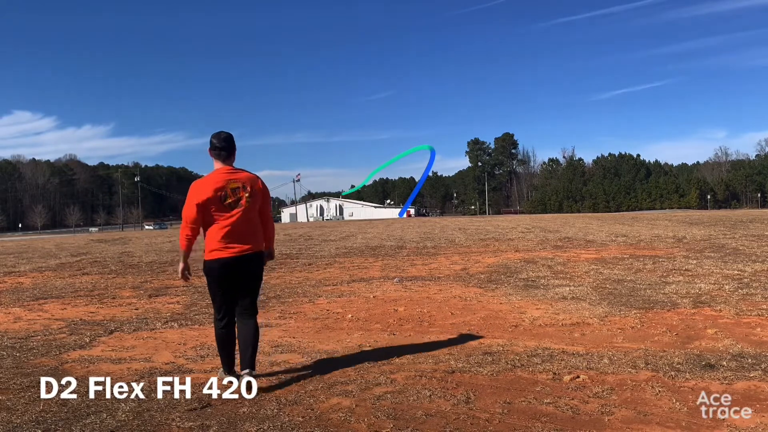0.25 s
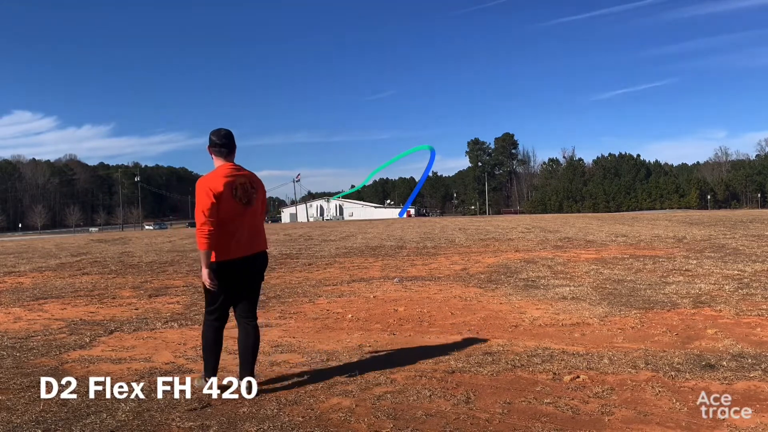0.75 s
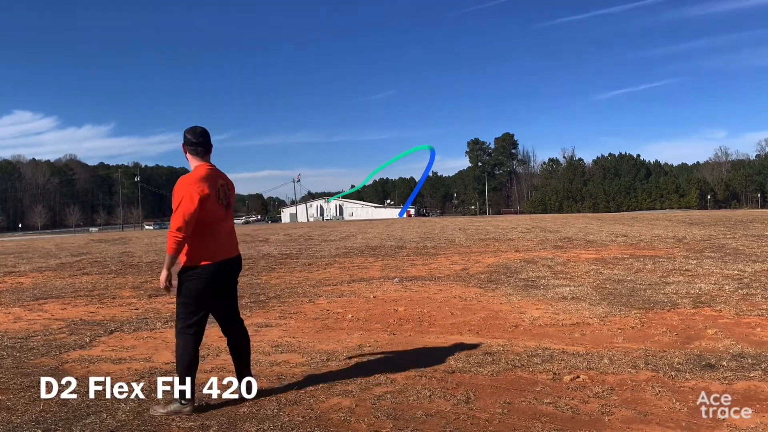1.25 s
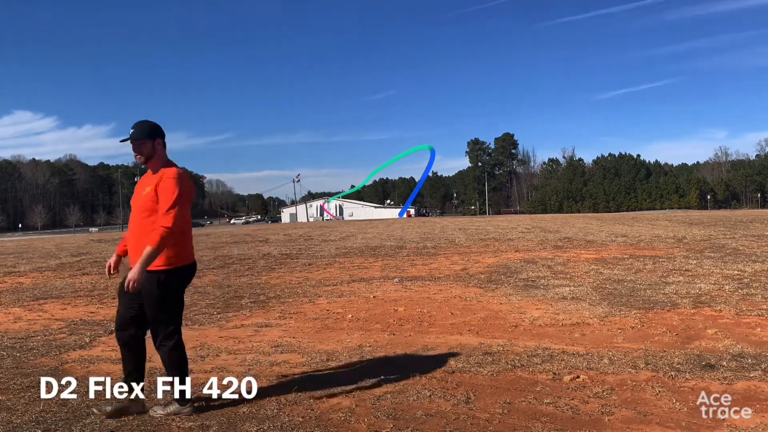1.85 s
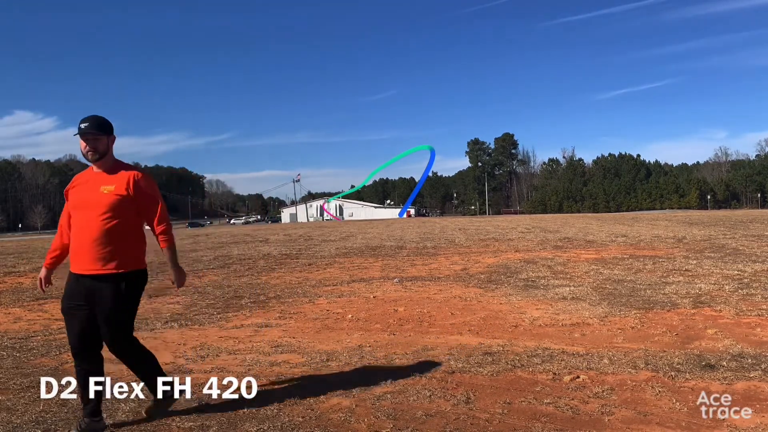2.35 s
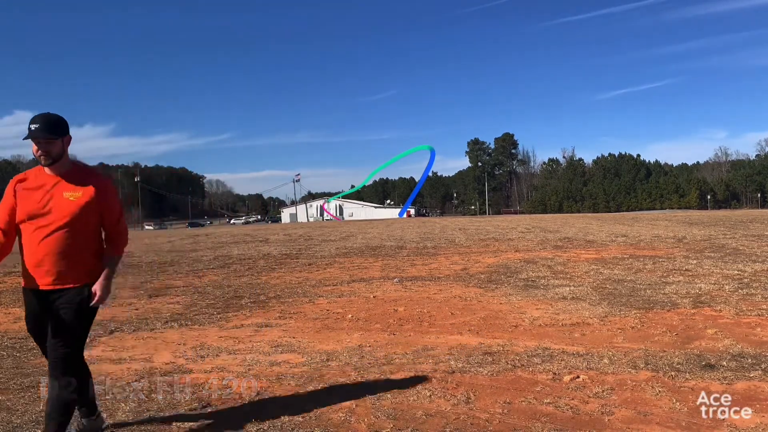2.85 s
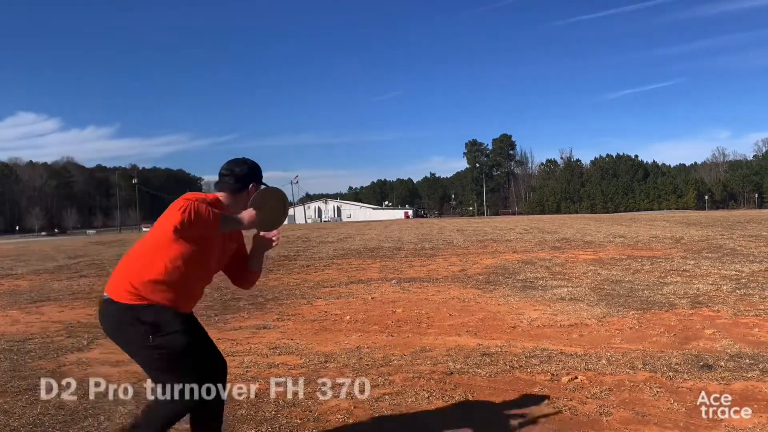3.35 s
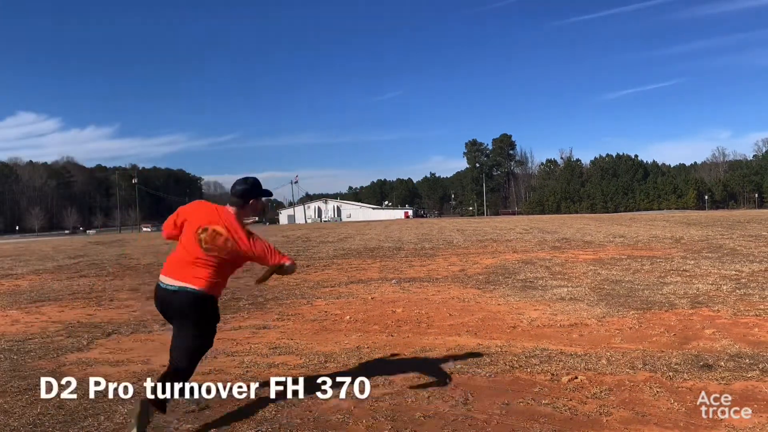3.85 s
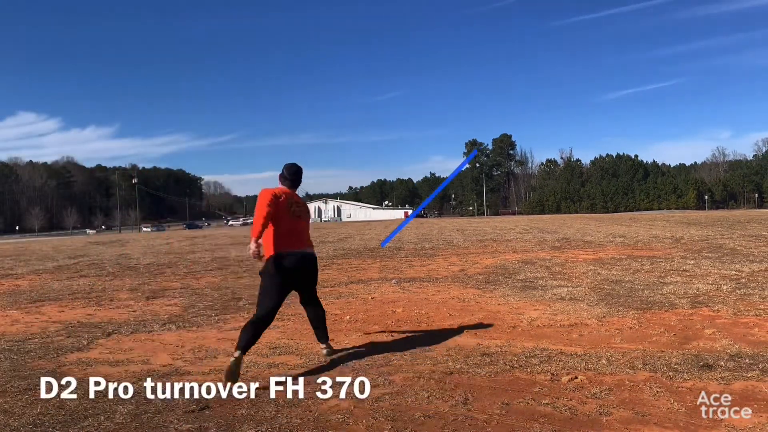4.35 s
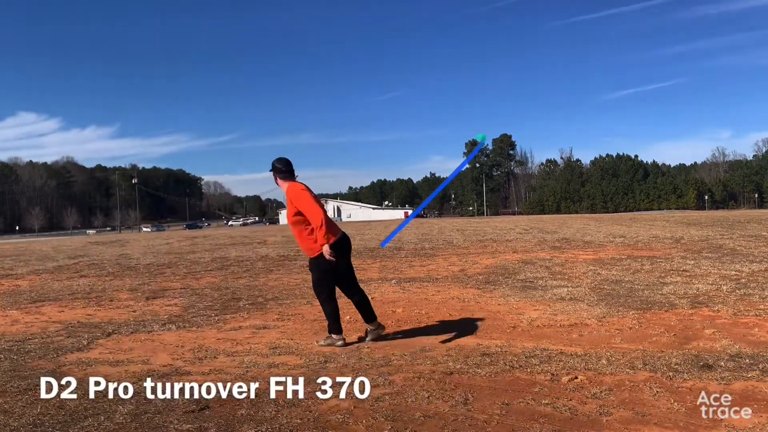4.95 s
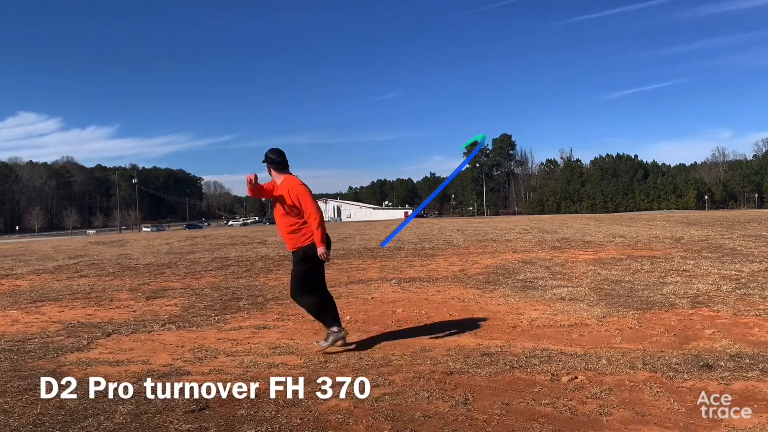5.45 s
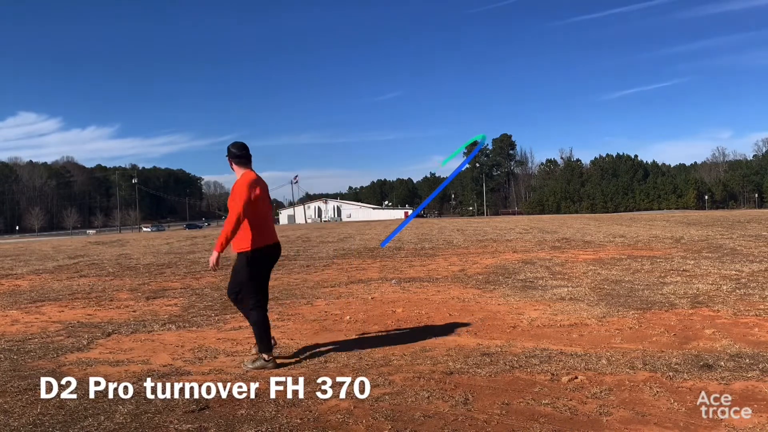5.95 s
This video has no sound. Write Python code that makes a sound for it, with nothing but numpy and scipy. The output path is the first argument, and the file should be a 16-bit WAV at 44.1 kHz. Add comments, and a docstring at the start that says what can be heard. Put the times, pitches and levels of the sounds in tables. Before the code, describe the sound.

In an open field near a road, traffic rumbles and soft wind buffets the microphone. A vehicle with a low, throbbing engine passes from left to right, its tyres hissing and grit ticking. After a quick dip, a far engine drones while nearby shoes rustle dry grass, scuff clay and snap stalks. A plastic disc is flung with a sharp, briefly ringing pop, and a few lighter steps follow.

```python
"""An open field near a road, in two moments joined by a short fade. In the first, a vehicle with a
loping engine passes from left to right, its tyres hissing and grit ticking; in the second, a far engine
drones. A walker's shoes rustle dry grass, scuff clay and knock clods, stalks snap, and a flung plastic
disc rings briefly. Traffic rumbles and soft wind buffets the microphone, whose two ports hear each
source with their own phase and level."""
import sys
import numpy as np
from scipy import signal
from scipy.fft import rfft, irfft, next_fast_len
from scipy.io import wavfile
from scipy.ndimage import uniform_filter1d, map_coordinates

SR = 44100
rng = np.random.default_rng(int(sys.argv[2]) if len(sys.argv) > 2 else 0)


def waveform_to_disk(signal):
    """Save audio, clipped to [-1, 1], as 16-bit WAV at the path in sys.argv[1]."""
    frames = np.transpose(np.atleast_2d(signal))
    scaled = np.clip(frames, -1, 1) * 32767
    samples = np.round(scaled).astype(np.int16)
    wavfile.write(sys.argv[1], SR, samples)


N = 273488
JOIN_S = 2.938  # the second moment begins

# Spectra of dry grass and of clay grit: (frequency [Hz], level [dB])
GRASS_SPECTRUM = [(3000, -20.5), (5000, -10), (7000, -2.5), (9000, 4.5), (10500, 5.5), (12500, 4.5),
                  (14000, 2.5), (15500, -4)]
GRIT_SPECTRUM = [(1800, -11.5), (2600, 0), (4000, 5.5), (6000, -2.5), (8500, -8)]
# Phase between the ports for far sounds and wind: (frequency [Hz], left lead [rad])
FAR_PHASE = [(60, -.1), (200, -.4), (350, .6), (750, 2.2), (1500, 2.7), (5000, 2.8), (8700, 3.14),
             (11200, 0), (13500, -3.14), (15800, -6.28)]
# Their balance: (frequency [Hz], left minus right [dB])
FAR_BALANCE = [(30, -0.5), (60, -0.5), (130, -6.5), (200, -7), (380, -2), (700, 1), (2400, -0.5),
               (5000, 1.5), (8000, 2)]


def passing_engine():
    """Periodic firing radiates engine orders; amplitude modulation of the second is heard as a lope."""
    # Firing: (time [s], frequency [Hz], level [dB])
    firing = [(.8, 50.5, -37), (1.1, 53, -37), (1.3, 55.5, -38), (1.55, 58.5, -41.5), (1.9, 59, -42),
              (2.3, 56.5, -39.5), (2.6, 55, -45), (2.92, 54.5, -40)]
    # Orders: (multiple of the firing frequency, relative level [dB])
    orders = [(1, 4), (1.5, 3.5), (3, -9.5), (4, -18)]
    # Second order at the crest of a swell: (time [s], level [dB])
    crests = [(.8, -32), (1.0, -27), (1.3, -29.5), (1.6, -28), (2, -28.5), (2.4, -33), (2.92, -37)]
    # Modulation rate: (time [s], rate [Hz])
    lope_rate = [(.8, 6.4), (1.12, 6.3), (1.2, 7.3), (2.92, 7.3)]
    lope_depth_db, crest_s = 14, 1.856
    hz, db = curves(firing)
    steady = amp(db) * tones(hz, orders, waver_db=0.4, drift_rad=0.53, rate=6.95)
    cycles = np.cumsum(curves(lope_rate)[0]) / SR
    lope_db = -lope_depth_db * np.sin(np.pi * (cycles - cycles[round(crest_s * SR)])) ** 2
    throb = tones(hz, [(2, 0.0089)], waver_db=1.0, drift_rad=0.31, rate=4.03)
    throb *= amp(curves(crests)[0] + lope_db)
    return window(firing[0][0], JOIN_S, 0.11) * steady + window(crests[0][0], JOIN_S, 0.081) * throb


def tyres():
    """Rolling contact radiates broadband hiss; impacts of grit tick as band-limited transients."""
    # Hiss: (time [s], level [dB])
    hiss_levels = [(0, -53.5), (.3, -54), (.6, -52.5), (.85, -50.5), (1.1, -48), (1.5, -45.5), (1.8, -48),
                   (2.1, -46), (2.3, -44), (2.5, -51), (2.92, -50)]
    # Spectra of hiss and ticks: (frequency [Hz], level [dB])
    hiss_spectrum = [(500, -8), (1000, 7.5), (2200, 0), (3500, -1), (5000, -1), (7000, -5), (8500, -22.5),
                     (11000, -36)]
    tick_spectrum = [(2000, 0.5), (8000, -2.0)]
    # Grit impacts: (time [s], level [dB], centre frequency [Hz])
    impacts = [(.2074, -43, 3550), (0.2877, -36.5, 6000), (.3277, -43, 6000), (.4194, -54, 6440),
               (.4813, -48, 5000), (0.5392, -36.5, 5400), (1.0071, -40, 4950), (1.1014, -31.5, 4700),
               (1.255, -38, 4880), (1.3673, -46, 3660), (1.4287, -37, 4100), (1.4985, -30, 4600),
               (1.5125, -34, 4300), (1.547, -36, 4200), (1.7959, -39, 3900), (1.884, -38, 4200),
               (2.4857, -32, 3480), (2.5566, -46, 4200), (2.6194, -35.5, 3760), (2.6853, -35, 3500),
               (2.7511, -39, 3600), (2.7646, -33, 3600), (2.8365, -42, 3500), (2.8669, -48, 3400)]
    hiss = unit(road_ports(noise(), hiss_spectrum, patchy_db=2.0, size=512))
    ticks = road_ports(puffs(impacts, t60=0.0076), tick_spectrum, patchy_db=2.5, size=128)
    return window(0, JOIN_S) * amp(curves(hiss_levels)[0] + 1.1 * wobble(60)) * hiss + ticks


def far_engine():
    """A rotating engine drones on harmonics of its shaft frequency."""
    # Shaft rotation: (time [s], frequency [Hz])
    shaft = [(2.96, 11.22), (3.6, 11.2), (3.98, 11.6), (4.2, 11.88), (4.5, 11.92), (6.2, 11.92)]
    # Drone: (time [s], level [dB])
    levels = [(2.96, -38.5), (3.5, -40), (3.9, -39.5), (4.4, -38), (5, -38.5), (5.6, -40.5), (6.2, -39.5)]
    # Harmonics: (multiple of the shaft frequency, relative level [dB])
    orders = [(8, -5.5), (9, -9), (10, -16), (11, 1.5), (12, -19), (13, -8.5), (15, -13.5), (16, -0.6),
              (17, -12), (19, -11), (27, -22)]
    drone = tones(curves(shaft)[0], orders, waver_db=1.18, drift_rad=0.25, rate=5.0)
    return window(JOIN_S, 7) * amp(curves(levels)[0]) * drone


def walker():
    """Friction of shoes on grass and clay, and the disc's wake: incoherent noises add in power."""
    # Shoe moves: (start [s], rise before it [s], hold [s], grass [dB], grit [dB], thud [dB])
    moves = [(0.707, .02, 0.067, -64.5, -80, -80), (1.124, .01, 0.098, -67.5, -80, -80.5),
             (1.458, 0.054, .09, -62, -78, -80), (2.11, .06, 0.27, -68, -82, -80),
             (2.348, .02, .04, -60.5, -80, -80), (2.391, .01, 0.019, -52.5, -82, -80),
             (2.838, 0.049, 0.14, -61, -78, -80), (2.968, .01, 0.071, -63, -60.5, -56.5),
             (3.064, 0.017, 0.48, -55.5, -61.5, -61), (3.206, 0.04, 0.011, -54.5, -53, -47.5),
             (3.225, 0.015, .01, -48, -49, -53), (3.261, .01, 0.0071, -51.5, -57, -70),
             (3.281, 0.015, 0.01, -43, -52, -71), (3.367, .015, 0.011, -43.5, -49.5, -60),
             (3.406, .012, 0.01, -45.5, -51, -60), (3.431, .01, 0.016, -53, -61, -55),
             (3.485, .02, 0.015, -47.5, -53.5, -56), (3.52, .015, 0.016, -45.5, -57, -60),
             (3.774, 0.077, 0.038, -52, -51.5, -49), (3.825, .02, 0.02, -45, -60, -64),
             (3.861, .012, .03, -46.5, -56, -47), (3.898, 0.0055, 0.032, -63, -65, -53.5),
             (4.292, 0.011, 0.013, -55, -54, -49.5), (4.328, .015, 0.044, -57, -66, -59),
             (4.676, .08, 0.012, -88, -75, -54.5), (4.708, .02, .008, -89, -76, -54),
             (4.817, 0.0206, 0.012, -69.5, -64, -48.5), (4.836, .01, 0.027, -65, -60.5, -55),
             (4.88, .012, 0.018, -54.5, -64, -64), (4.931, 0.022, 0.056, -66, -61.5, -58.5),
             (5.017, .02, 0.022, -68, -64, -60), (5.623, .01, 0.016, -60.5, -61.5, -54.5),
             (5.753, 0.0068, .008, -69.5, -81, -74.5), (6.02, .04, 0.017, -90, -81.5, -68),
             (6.107, 0.012, 0.01, -77.5, -79, -72), (6.151, .01, .04, -78.5, -89, -74)]
    # Thud of a loaded sole: (frequency [Hz], level [dB])
    thud_spectrum = [(500, -3), (900, 4.5), (1500, 3.5), (2300, -2.5), (3200, -6), (4500, -13.5)]
    release_db_per_s, settle_db = 550, -17
    power = np.zeros((3, N))  # grass, grit, thud
    # Grass and grit stir faintly between the moves.
    power[0] = amp(np.where(np.arange(N) < JOIN_S * SR, -77, -86.5) + 2.5 * wobble(6.5)) ** 2
    power[1] = amp(-89.5) ** 2
    for start, rise, hold, *dbs in moves:
        power += (amp(dbs)[:, None] * envelope(start, rise, hold, release_db_per_s)) ** 2
        trickle = amp(dbs[1] + settle_db) * envelope(start, rise, hold, fall_db_per_s=120.5)
        power[1] += trickle ** 2
    # Air whishes behind the disc in the colours of grit and thud.
    whish = dict(start=4, rise=0.9, hold=0.08)
    power[1:] += (amp(-73) * envelope(**whish, fall_db_per_s=release_db_per_s)) ** 2
    power[1] += (amp(-68.5) * envelope(**whish, fall_db_per_s=44.5)) ** 2
    grass, grit, thud = np.sqrt(power)
    return (grass * crackle(GRASS_SPECTRUM, spiky_db=2.0, rate=320)
            + grit * crackle(GRIT_SPECTRUM, spiky_db=1.5, rate=300)
            + thud * crackle(thud_spectrum, spiky_db=0.0, rate=180))


def stalk_snaps():
    """Brittle fracture gives a short broadband transient, here with a low and a bright part."""
    # Fractures: (time [s], low level [dB], bright level [dB])
    fractures = [(1.1255, -46, -45.5), (1.498, -50, -56), (2.359, -46, -39.5), (3.2086, -44, -41),
                 (3.262, -54, -41), (3.3518, -38, -21), (3.3623, -54, -35.5), (3.377, -44, -28),
                 (3.408, -50, -40.5), (3.526, -42, -32.5), (3.5468, -52, -41), (3.6468, -50, -58.5),
                 (3.879, -45, -36.5), (3.889, -44, -41.5), (3.897, -33, -22.5), (3.8995, -38, -37),
                 (4.281, -47, -52.5), (4.2948, -44, -49), (4.33, -54, -45.5), (4.38, -54, -55),
                 (4.5043, -52.5, -60.5), (4.546, -60, -48.5), (4.565, -48, -65), (4.8165, -50, -63),
                 (4.823, -50, -63), (4.8486, -47, -54.5), (4.8847, -47, -42), (4.9077, -58, -51.5),
                 (4.9329, -52, -57.5), (4.9485, -50, -56), (4.9788, -55, -46.5), (5.0182, -53, -60),
                 (5.034, -60.5, -56.5), (5.1434, -68, -68), (5.3316, -57, -52.5), (5.338, -58, -65),
                 (5.623, -56, -57), (5.764, -68.5, -59), (6.153, -66, -60.5)]
    times, low_db, bright_db = np.transpose(fractures)
    low = puffs(zip(times, low_db), t60=.004)
    bright = puffs(zip(times, bright_db), t60=.004)
    return near_ports(bright, GRASS_SPECTRUM, size=128) + near_ports(low, GRIT_SPECTRUM, size=128)


def disc_ring():
    """Leaving the fingers, the disc rings in damped modes; a random walk of phase broadens each."""
    # Modes: (frequency [Hz], relative level [dB], 60 dB decay time [s])
    modes = [(415, -4.5, 0.028), (1040, 0, 0.016), (1510, -8.5, .008), (2330, -11, 0.0053),
             (3600, -10, 0.0062)]
    fling_s, attack_s = 3.897, 0.0013
    t = np.arange(SR // 10) / SR
    ring = np.zeros(N)
    for hz, db, t60 in modes:
        phase = 2 * np.pi * hz * t + .07 * np.cumsum(rng.standard_normal(len(t)))
        decay = amp(db - 60 * t / t60) * (1 - np.exp(-t / attack_s))
        ring[round(fling_s * SR):][:len(t)] += decay * np.sin(phase)
    return amp(-24.5) * ring


def clod_knocks():
    """The impact of a sole on a clod is a heavily damped band of noise."""
    # Impacts: (time [s], level [dB], centre frequency [Hz])
    impacts = [(3.137, -45, 1170), (3.21, -47.5, 1300), (3.233, -44, 1100), (3.432, -43, 950),
               (3.439, -41, 940), (3.509, -45, 1300), (3.911, -47.5, 2190), (4.819, -45.5, 1900),
               (4.826, -45.5, 2070), (4.845, -48, 1900)]
    return puffs(impacts, t60=.02)[0]


def traffic_tones():
    """Tonal components of other traffic glide and waver as they propagate."""
    # Tones: (start [s], end [s], first frequency [Hz], last frequency [Hz], level [dB])
    hums = [(0.33, 0.836, 193, 189, -37.5), (1.19, 2.78, 190, 189, -44), (1.144, 1.9, 455, 443, -51.5),
            (2.647, 2.93, 443, 444, -49), (2.4, 2.92, 460, 450, -58.5), (1.875, 3.06, 74, 85, -41),
            (1.42, 2.08, 339, 334, -50), (3.35, 3.65, 355, 355, -58.5), (4.7, 6.05, 356, 355, -56.5)]
    sound = np.zeros(N)
    for start, end, first_hz, last_hz, db in hums:
        hz, = curves([(start, first_hz), (end, last_hz)])
        gate = window(start, end, edge_s=0.13) * window(-1, JOIN_S if start < JOIN_S else 7)
        sound += gate * amp(db) * tones(hz, [(1, 0.00087)], waver_db=3.0, drift_rad=0.99, rate=12.0)
    return sound


def far_traffic():
    """Many distant engines and tyres superpose into a rumble and a wash, partly coherent at the ports."""
    # Traffic: (time [s], rumble level [dB], wash level [dB])
    levels = [(0, -28.5, -39.5), (.4, -31, -41), (.8, -29.5, -42.5), (1.2, -29.5, -42.5),
              (1.7, -29.5, -43.5), (2.4, -28, -45.5), (2.92, -26, -46), (2.96, -32, -47), (3.3, -35, -47.5),
              (3.65, -38.5, -48), (3.75, -34.5, -45.5), (4, -38.5, -46), (4.6, -40, -47), (5.1, -40, -47.5),
              (5.6, -34, -47), (6.2, -40, -47)]
    # Spectra, one for each moment: (frequency [Hz], level [dB])
    rumble_spectra = [
        [(15, -44.5), (25, -19.5), (46, -5.5), (80, -5.5), (105, -4.5), (118, -7), (136, -4), (156, -15.5),
         (193, -11), (225, -20.5), (300, -22), (447, -26.5), (500, -31), (650, -44.5), (1100, -120)],
        [(15, -56.5), (25, -30), (43, -8.5), (102, -2), (134, -8.5), (156, -7), (188, -9.5), (248, -15.5),
         (356, -25), (500, -35), (650, -60), (1100, -120)],
    ]
    wash_spectra = [
        [(150, -27), (250, -4.5), (350, -8.5), (500, -14), (800, -12.5), (1300, -22), (1800, -25.5),
         (2500, -33.5), (3300, -55), (4500, -53), (11000, -55), (15500, -66.5)],
        [(150, -33), (250, -5), (350, -7.5), (500, -15), (800, -16), (1300, -22), (1800, -25), (2500, -33),
         (3300, -51.5), (4500, -61), (9000, -61), (11000, -59.5), (15500, -66.5)],
    ]
    # Likeness of the ports: (frequency [Hz], coherence [0-1])
    coherence = [(60, 0.87), (130, 0.93), (350, 0.11), (750, 0.71), (1500, 0.18), (3000, 0.22),
                 (7000, 0.83), (9000, 1)]
    far = (coherence, FAR_PHASE, FAR_BALANCE)
    rumbles = [unit(ports(noise(), s, *far, patchy_db=1.4, size=4096)) for s in rumble_spectra]
    washes = [unit(ports(noise(), s, *far, patchy_db=1.5)) for s in wash_spectra]
    rumble_db, wash_db = curves(levels)
    first_moment = np.arange(N) < JOIN_S * SR
    return (amp(rumble_db + 1.2 * wobble(7.11)) * np.where(first_moment, *rumbles)
            + amp(wash_db + 0.25 * wobble(8.2)) * np.where(first_moment, *washes))


def wind():
    """Turbulent pressure at the microphone makes soft low buffets, a little different at each port."""
    # Buffeting: (time [s], level [dB])
    levels = [(0, -37), (.8, -34.5), (1.4, -38.5), (2.15, -45.5), (2.43, -47), (2.6, -44), (2.9, -30),
              (2.98, -57), (3.1, -42), (3.4, -54), (3.66, -43), (3.75, -35.5), (3.9, -48), (4.4, -46),
              (4.9, -40), (5.3, -55.5), (5.7, -44.5), (6.2, -51)]
    # Gust spectrum: (frequency [Hz], level [dB])
    spectrum = [(20, -23.5), (35, -9.5), (55, -0.5), (75, -4.5), (110, -20.5), (200, -50.5)]
    gust = ports(noise(), closed(spectrum), [(30, 0.6), (80, .88)], FAR_PHASE, FAR_BALANCE, size=4096)
    return amp(curves(levels)[0] + 2 * wobble(4.4)) * unit(gust)


def tones(pitch_hz, orders, waver_db, drift_rad, rate):
    """Partials on multiples of a pitch, each fluctuating in level and phase on its way through air."""
    phase = 2 * np.pi * np.cumsum(pitch_hz) / SR
    return sum(np.sqrt(2) * amp(db + waver_db * wobble(rate))
               * np.sin(k * phase + drift_rad * wobble(rate) + rng.uniform(0, 2 * np.pi))
               for k, db in orders)


def crackle(spectrum, spiky_db, rate):
    """Random amplitude modulation breaks nearby noise into grains, a few of which stand out."""
    grains = amp(spiky_db * wobble(rate) + 2.0 * wobble(70))
    grains *= 1 + 2.3 * np.clip(wobble(600) - 1.8, 0, None)
    return unit(near_ports(noise() * grains, spectrum, size=256, patchy_db=1.5))


def puffs(rows, t60):
    """Exponentially decaying noise bursts, equal in energy before their level; a centre is optional."""
    attack_s, band_ratio = .00015, 1.42
    out, t = np.zeros((2, N + SR)), np.arange(SR // 50) / SR
    decay = amp(-60 * t / t60) * (1 - np.exp(-t / attack_s))
    for start, db, *centre in rows:
        puff = decay * rng.standard_normal((2, len(t)))
        if centre:
            band = [centre[0] / band_ratio, centre[0] * band_ratio]
            puff = signal.sosfilt(signal.butter(2, band, "band", fs=SR, output="sos"), puff)
        puff *= np.linalg.norm(decay) / np.linalg.norm(puff, axis=1)[:, None]
        out[:, round(start * SR):][:, :len(t)] += amp(db) * puff
    return out[:, :N]


def road_ports(pair, spectrum, patchy_db, size):
    """The difference in arrival time at the ports follows the vehicle's bearing."""
    # Arrival: (time [s], left lag [ms])
    lag = [(0, -0.17), (.2, -0.087), (.5, -0.0037), (.8, 0.081), (1.1, 0.15), (1.5, 0.2), (2, 0.23),
           (2.92, 0.24)]
    # Phase between the ports: (frequency [Hz], left lead [rad])
    phase = [(260, -12), (780, 4), (1400, 6), (4500, 5.5), (6500, 5)]
    coherence = [(1000, 0.99), (4000, 0.87), (8000, 0.61)]
    balance = [(700, -5.0), (1500, -4.0), (3500, 1.5), (5500, 0.5), (7500, -2.5)]
    return ports(pair, closed(spectrum), coherence, phase, balance, lag, patchy_db, size)


def near_ports(pair, spectrum, size, patchy_db=0.0):
    """The phase between the ports depends on source position, and switches as the walker steps away."""
    # Likeness of the ports: (frequency [Hz], coherence [0-1])
    coherence = [(1000, .6), (2600, .9), (3400, .97), (7000, .8), (8500, .98), (15000, .98)]
    # Phase before and after the step: (frequency [Hz], left lead [rad])
    phase = [(300, .5), (860, 2.3), (1980, 1.5), (2670, 2.9), (3400, 3.14), (4480, 4.2), (5430, 3.8),
             (6720, 5.7), (8500, 3.14), (10800, 0), (11600, -.3), (13300, -3.14), (15800, -6.28)]
    away_phase = [(0, -0.5), (780, 2), (1890, 0.3), (3450, 2.5), (4650, 1.77), (5250, 2.5), (5860, 2.1),
                  (6720, -0.4), (7840, -2.5), (9300, -3), (10500, -7.5), (11500, -5), (12700, -8.8),
                  (14300, -10.0), (15300, -13), (16600, -13.5)]
    # Balance: (frequency [Hz], left minus right [dB])
    balance = [(2500, 1.5), (5000, -5), (7000, 0), (9000, 0)]
    return ports(pair, closed(spectrum), coherence, phase, balance,
                 patchy_db=patchy_db, size=size, away_phase=away_phase)


def ports(pair, spectrum, coherence, phase, balance, lag_ms=((0, 0),), patchy_db=0.0, size=1024,
          away_phase=None):
    """Sum and difference of two signals set the coherence of left and right; phase and gain place them."""
    step_away_s = 3.875
    hz, t, (common, side) = signal.stft(pair, SR, nperseg=size)
    patches = uniform_filter1d(rng.standard_normal(common.shape), size=8, axis=0)
    patches = uniform_filter1d(patches, size=6, axis=1)  # level varies over frequency and time
    gain = amp(along(spectrum, hz) + patchy_db * unit(patches))
    mix = np.arccos(np.clip(along(coherence, hz), 0, 1)) / 2
    lag_s = np.interp(t, *np.transpose(lag_ms)) / 1000
    radians = np.where(t < step_away_s, along(phase, hz), along(away_phase or phase, hz))
    lead = np.exp(.5j * (radians - 2 * np.pi * hz[:, None] * lag_s))
    tilt = amp(along(balance, hz) / 2)
    left = (np.cos(mix) * common + np.sin(mix) * side) * lead * tilt
    right = (np.cos(mix) * common - np.sin(mix) * side) / lead / tilt
    return signal.istft(np.array([left, right]) * gain, SR, nperseg=size)[1][:, :N]


def amp(db):
    """Decibels to amplitude."""
    return 10 ** (np.asarray(db) / 20)


def unit(x):
    """Scaled to rms 1."""
    return x / np.sqrt(np.mean(np.abs(x) ** 2) + 1e-20)


def along(points, hz):
    """A column of values interpolated on a log frequency axis."""
    f, values = np.transpose(points)
    return np.interp(np.log(hz + 1), np.log(f + 1), values)[:, None]


def closed(points):
    """A spectrum that falls 40 dB beyond its ends."""
    return [(points[0][0] / 2, points[0][1] - 40), *points, (points[-1][0] * 1.8, points[-1][1] - 40)]


def curves(rows):
    """One value per sample for each column after the time."""
    times, *columns = np.transpose(rows)
    return [np.interp(np.arange(N) / SR, times, column) for column in columns]


def window(start, end, edge_s=0.027):
    """Gain 1 between two times, with linear ramps outside them."""
    t = np.arange(N) / SR
    return np.clip(np.minimum(t - start, end - t) / edge_s + 1, 0, 1)


def envelope(start, rise, hold, fall_db_per_s):
    """Quadratic rise up to the start, a hold, then exponential decay."""
    t = np.arange(N) / SR - start
    return np.clip(t / rise + 1, 0, 1) ** 2 * amp(-fall_db_per_s * np.clip(t - hold, 0, 3))


def wobble(rate):
    """A smooth random curve with rate knots a second."""
    return map_coordinates(rng.standard_normal(int(N * rate / SR) + 4), [np.arange(N) * rate / SR])


def noise():
    """Two uncorrelated white noises."""
    return rng.standard_normal((2, N))


def scene():
    """Linear superposition of all sources at the two ports."""
    silence = np.zeros(N)
    engines = ports([far_engine() + passing_engine() + traffic_tones(), silence], [(100, 0.97)],
                    coherence=[(100, 0.87)], phase=FAR_PHASE, balance=FAR_BALANCE, size=4096)
    field = engines + far_traffic() + wind() + tyres() + walker() + stalk_snaps()
    impacts = ports([disc_ring() + clod_knocks(), silence], [(1000, 0.0031)],
                    coherence=[(1000, 0.88)], phase=[(1000, 0.59)], balance=[(1000, 0)])
    return field + amp(3.5) * impacts


def record(dry):
    """A quick fade out and in at the join, the microphone's high-pass response, then a band limit."""
    fade_out_s, fade_in_s = 0.029, 0.041
    bass_cut_hz, top_hz = 51.5, 15900
    t = np.arange(N) / SR - JOIN_S
    faded = dry * np.clip(np.where(t < 0, -t / fade_out_s, t / fade_in_s), .04, 1)
    thinned = signal.sosfilt(signal.butter(3, bass_cut_hz, "high", fs=SR, output="sos"), faded)
    size = next_fast_len(N + SR // 2)
    passband = np.fft.rfftfreq(size, 1 / SR) < top_hz
    return irfft(rfft(thinned, size) * passband, size)[:, :N]


dry = scene()
out = record(dry)
waveform_to_disk(out)
```